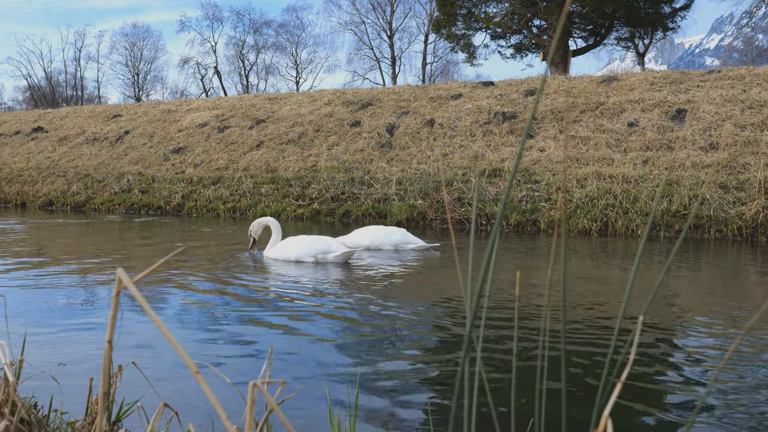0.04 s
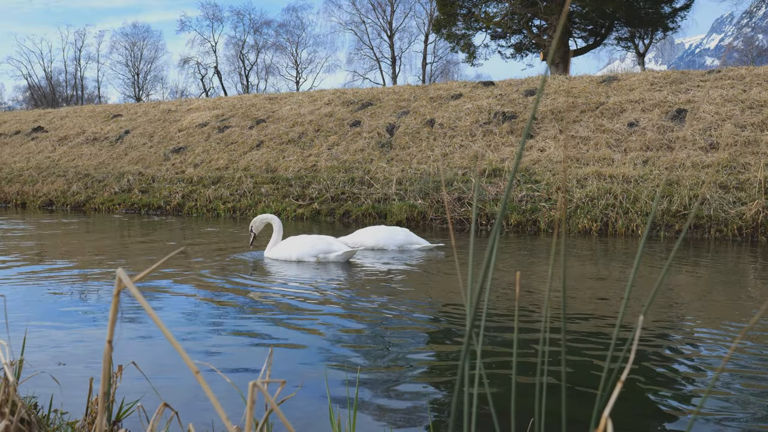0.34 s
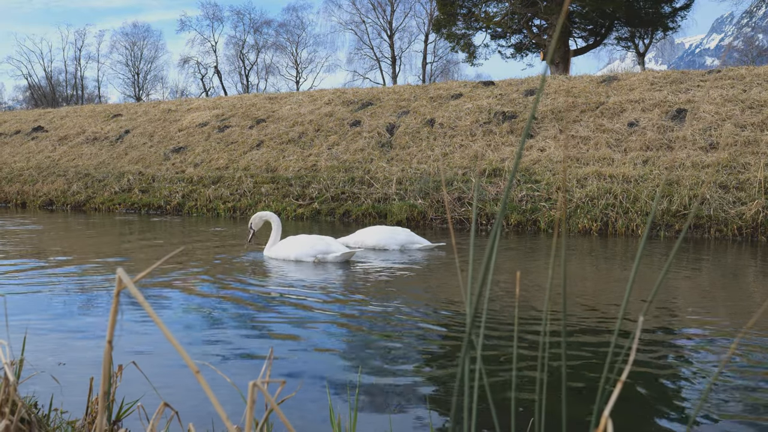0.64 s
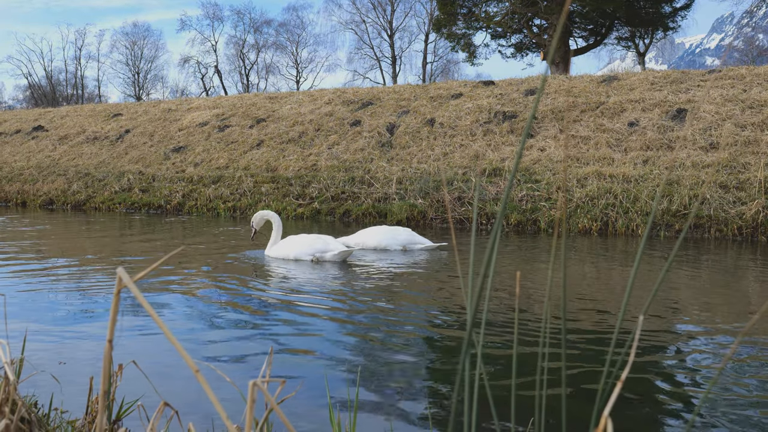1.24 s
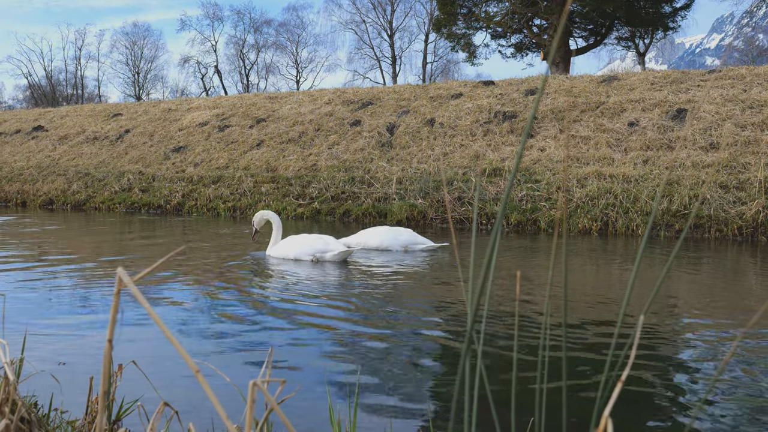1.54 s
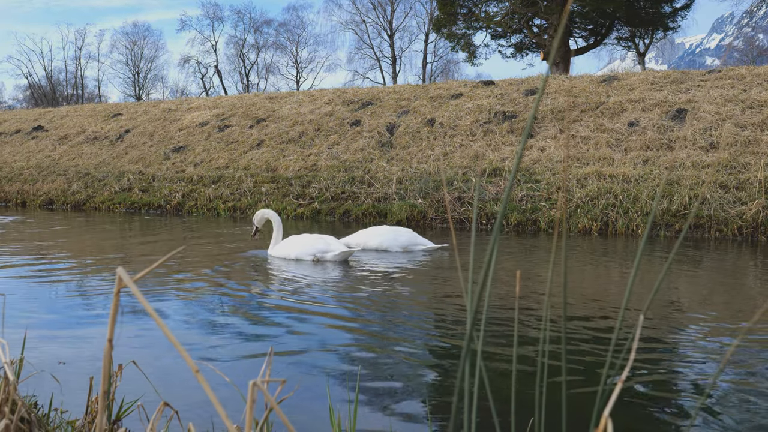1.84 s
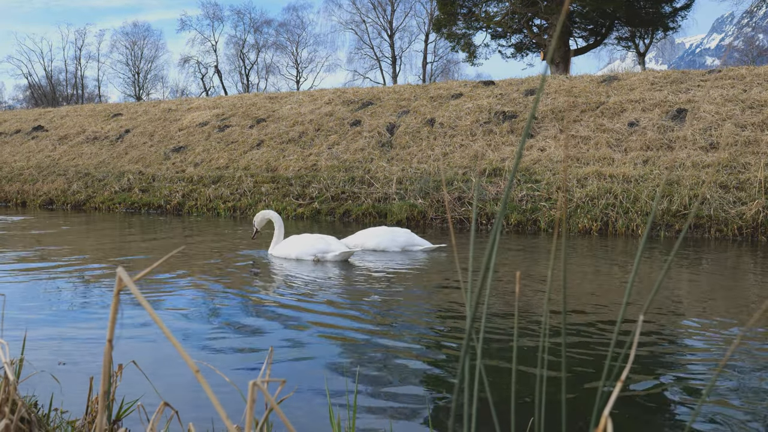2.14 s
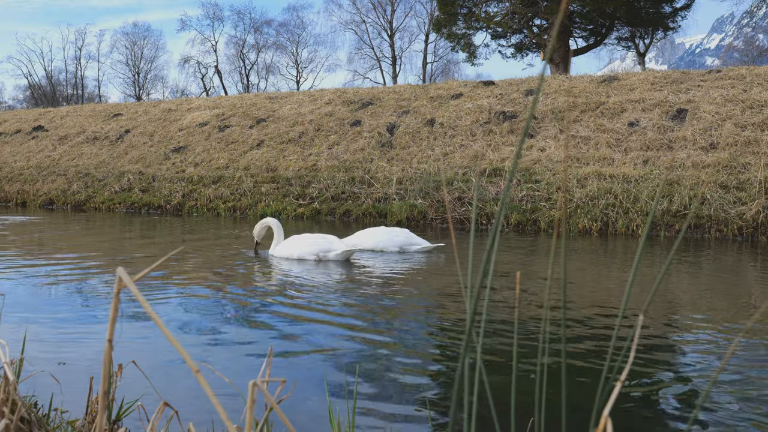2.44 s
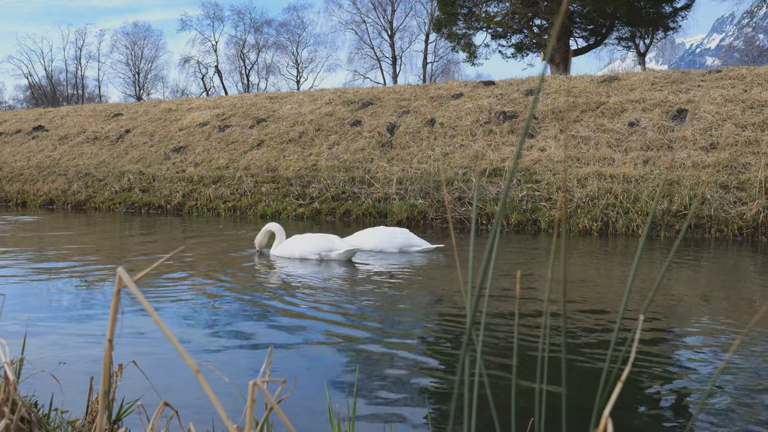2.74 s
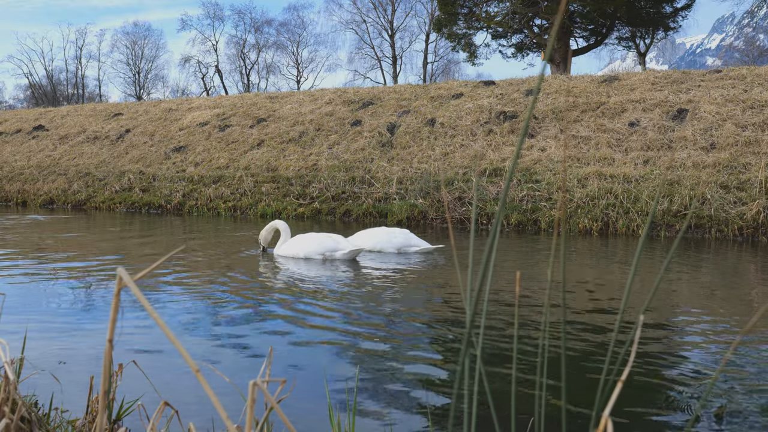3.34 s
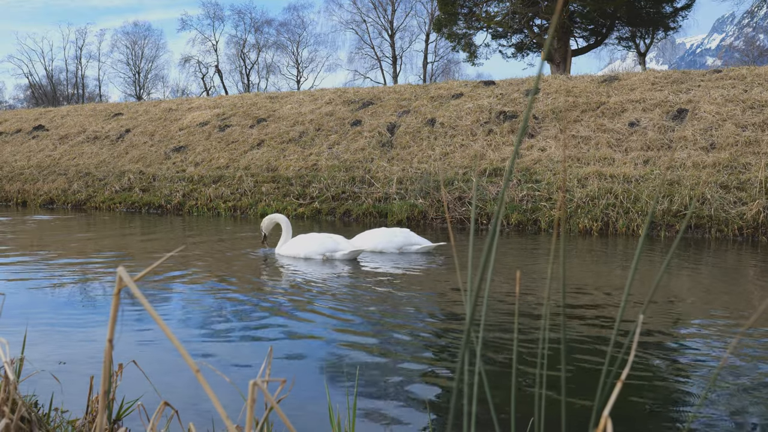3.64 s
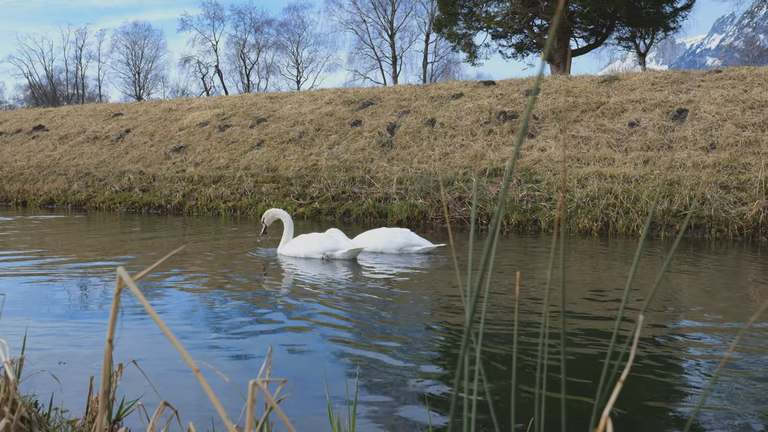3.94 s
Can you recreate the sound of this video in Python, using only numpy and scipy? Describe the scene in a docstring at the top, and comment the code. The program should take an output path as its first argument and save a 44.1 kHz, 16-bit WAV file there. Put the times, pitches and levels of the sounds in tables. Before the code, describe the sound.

Small water drops plink and spatter beside a channel over a steady rumble of distant traffic. Dry reeds tick, a lens motor buzzes softly at the microphone early on, and a far bird calls faintly near the end.

```python
"""A quiet channel bank where swans feed, over a steady bed of distant traffic and faint hiss.
Drops plink and spatter from the start, each a splash and a ringing bubble, and dry reeds tick throughout.
From about 0.45 s a camera's lens motor buzzes softly for a second, its steps ringing the housing.
A far engine swells near 1.8 s and fades; then the drops and ticks grow busier.
Just after 3 s a far bird gives one long falling mew, joined by two fainter ones."""
import sys
import numpy as np
from scipy import signal
from scipy.fft import rfft, irfft
from scipy.io import wavfile

SR = 44100
rng = np.random.default_rng(int(sys.argv[2]) if len(sys.argv) > 2 else 0)


def to_wav(sig):
    """Store sig (one row per channel, or 1-D mono) as 16-bit WAV at the path in sys.argv[1].

    Samples outside -1..1 are clipped; the rate is SR.
    """
    pcm = np.clip(np.atleast_2d(sig), -1, 1) * 32767
    pcm = np.round(pcm).astype(np.int16)
    wavfile.write(sys.argv[1], SR, pcm.T)  # frames by channels


N = 176400
TIME = np.arange(N) / SR
HZ = np.maximum(np.arange(N // 2 + 1) * SR / N, 1)


def from_db(db):
    """Decibels to gain."""
    return 10 ** (np.asarray(db) / 20)


def unit_rms(x):
    """Scale to unit power."""
    return x / np.sqrt(np.mean(x ** 2) + 1e-20)


def over_hz(points):
    """Read a curve along log frequency."""
    hz, value = np.transpose(points)
    return np.interp(np.log(HZ), np.log(hz), value)


def fader(points):
    """A gain ride through points of t/s, level/dB."""
    return from_db(np.interp(TIME, *np.transpose(points)))


def drift(rate_hz):
    """A smooth random wander, mostly slower than rate_hz; rms 1."""
    return unit_rms(irfft(rfft(rng.standard_normal(N)) / (1 + (HZ / rate_hz) ** 2), N))


def wavering_tone(hz, width_hz):
    """A sine whose pitch wanders slightly; rms 1."""
    return unit_rms(np.sin(2 * np.pi * np.cumsum(hz + width_hz / 2 * drift(7.77)) / SR))


def ragged_tone(phase, width_hz):
    """A tone broken up into a narrow band of noise around its pitch; rms 1."""
    return unit_rms(drift(width_hz) * np.sin(phase) + drift(width_hz) * np.cos(phase))


def band_noise(edges_hz, samples):
    """A grain of band-passed noise; rms 1."""
    band = signal.butter(2, edges_hz, "band", fs=SR, output="sos")
    return unit_rms(signal.sosfilt(band, rng.standard_normal(samples)))


def air_noise(spectrum, flicker_db):
    """A flickering bed of coloured stereo noise, mono in the bass and wider above."""
    # likeness of the two ears: f/Hz, correlation (capped at 1 below)
    likeness = [(300, 0.96), (420, 1.46), (700, 1), (1200, 0.72), (2400, .5), (4400, 0.21), (6000, 0.26),
                (8100, 1), (10500, 0.73), (15000, 0.2)]
    # lean of the stereo image: f/Hz, left minus right/dB
    balance = [(300, -1.5), (640, -3), (1200, -3), (2300, 0.3), (7000, 0), (15000, -0.5)]
    colour = from_db(over_hz(spectrum)) / np.sqrt(1 + (HZ / (2 * spectrum[-1][0])) ** 10)
    width = np.clip(HZ / 260 - 1, 0, 1)  # mono below 260 Hz
    ears = np.array([[1], [-1]])
    alike = 1 - width * (1 - np.clip(over_hz(likeness), 0, 1))
    mid, side = rfft(rng.standard_normal((2, N)))
    stereo = np.sqrt(1 + alike) * mid + np.sqrt(1 - alike) * side * ears
    lean = from_db(ears * width * over_hz(balance) / 2)
    return unit_rms(irfft(colour * stereo * lean, N)) * from_db(flicker_db * drift(17.0))


def add(out, start_s, sound):
    """Mix a short sound in at start_s."""
    i = max(int(start_s * SR), 0)
    out[..., i:i + sound.shape[-1]] += sound[..., :max(N - i, 0)]


def over_water(sound):
    """Pan a small sound near the middle and add its reflection off the water."""
    spread_db, echo_s, echo_db = 4, 0.0019, -10.5
    out = np.zeros((2, 2 * len(sound)))
    for ear, pan_db in zip(out, np.array([1, -1]) * rng.normal() * spread_db / 2):
        add(ear, 0, sound * from_db(pan_db))
        add(ear, echo_s * rng.uniform(0.87, 1.3), sound * from_db(echo_db))
    return out


def bank_scatter(sound, t60_s=0.12, wet_db=-9):
    """The grassy banks scatter back a short, faint tail."""
    t = TIME[:SR // 4]
    tail = rng.standard_normal((2, len(t))) * from_db(-60 * t / t60_s)
    tail /= np.sqrt(np.sum(tail ** 2, axis=1, keepdims=True))
    return sound + from_db(wet_db) * signal.fftconvolve(sound, tail, axes=1)[:, :N]


def traffic():
    """Distant traffic: a low rumble under the roar of tyres."""
    # colour of the rumble: f/Hz, relative level/dB
    rumble_colour = [(25, -42), (48, -35), (60, -31), (70, -21), (82, -4.5), (93, -12), (108, 0), (135, 1),
                     (158, -1), (185, 0), (225, -2.5), (265, -6), (298, -4), (340, -10), (390, -16),
                     (560, -30)]
    # colour of the tyre roar: f/Hz, relative level/dB
    tyre_colour = [(350, -17.5), (470, 0), (570, -7), (660, 1), (790, 0.5), (890, -1.5), (1030, 2),
                   (1170, -4.5), (1320, -9.5), (1600, -13), (2100, -14.5), (3500, -25.5)]
    # ride of the tyre roar: t/s, level/dB
    tyre_ride = [(0, -61.5), (1.2, -61.5), (2.2, -62.5), (3.2, -62), (4, -63.5)]
    rumble = from_db(-47) * air_noise(rumble_colour, flicker_db=0.23)
    return rumble + fader(tyre_ride) * air_noise(tyre_colour, flicker_db=1.38)


def hiss():
    """A faint, airy hiss on top of the bed."""
    # colour of the hiss: f/Hz, relative level/dB
    colour = [(1000, 1), (2000, -2.5), (3000, 2.5), (4000, 4), (5200, 0), (6500, -1), (8200, -1.5),
              (9800, -1), (12000, -3), (14000, -3.5), (15800, -7)]
    return from_db(-68) * air_noise(colour, flicker_db=0.6)


def far_hum(hz=686.6):
    """A grainy midrange hum that sinks away."""
    # ride of the hum: t/s, level/dB
    ride = [(0, -66.5), (1.0, -69.5), (1.5, -67.5), (2.3, -72.5), (4, -75.5)]
    return fader(ride) * ragged_tone(2 * np.pi * hz * TIME, width_hz=12)


def far_engine():
    """An engine drones inside the rumble, dips, swells and fades."""
    # ride of the drone: t/s, level/dB
    ride = [(0, -53.5), (.3, -52), (.75, -52.5), (1.0, -63), (1.4, -58.5), (1.8, -51), (2.1, -57),
            (2.5, -63.5), (4, -68)]
    return fader(ride) * wavering_tone(hz=157, width_hz=10.97)


def whines():
    """Three thin, steady whines, barely there."""
    # high tones: f/Hz, rms level/dB, width/Hz
    tones = [(3352, -92, 8), (8000, -92.5, 2), (12000, -88, 2)]
    return sum(from_db(db) * wavering_tone(hz, width_hz) for hz, db, width_hz in tones)


def lens_motor(start_s=0.4465, stop_s=1.56, level_db=-62):
    """Fifty groups of four uneven steps a second knock on the camera's housing and blur into a buzz."""
    # ringing modes of the housing: f/Hz, relative level/dB, t60/s
    modes = [(1490, -5, 0.018), (1950, 0, 0.023), (2060, -8.5, 0.016), (2480, -1, 0.011),
             (3320, -11, 0.0074)]
    group_s, accents_db = 0.02, [-0.5, -6.5, -7.5, -18]
    jitter_s, uneven_db = 0.0001, 3.5
    out, t = np.zeros((2, N)), TIME[:SR // 50]
    for step, step_s in enumerate(np.arange(start_s, stop_s, group_s / len(accents_db))):
        knock = np.zeros((2, len(t)))
        for hz, db, t60_s in modes:
            strike_db = db + uneven_db * rng.standard_normal((2, 1))
            knock += from_db(strike_db - 60 * t / t60_s) * np.sin(2 * np.pi * hz * t)
        gain = from_db(level_db + accents_db[step % len(accents_db)])
        add(out, step_s + jitter_s * rng.normal(), gain * knock)
    return out


def reed_ticks(attack_s=0.00017, t60_s=0.0071, trim_db=-2, top_hz=13400):
    """Each tick is a tiny burst of fracture through one resonance of a dry stalk."""
    # reed ticks: t/s, centre f/Hz, level before trim/dB, width/octaves
    ticks = [(.048, 5900, -51.5, 0.37), (0.115, 6540, -42, 0.73), (.164, 9700, -49.5, .3),
             (.174, 11000, -53, .6), (0.703, 11400, -46.5, 0.49), (.878, 11900, -53, .5),
             (1.176, 9500, -53, .3), (1.186, 9300, -54, .4), (1.191, 10500, -57, .4),
             (1.29, 10300, -53, 0.44), (1.294, 10300, -50, .3), (1.414, 10000, -53.5, .3),
             (1.516, 11800, -45, 0.16), (1.769, 7400, -54, 0.33), (1.958, 10300, -51, .15),
             (2.037, 11300, -48, 0.13), (2.177, 10600, -51, .2), (2.265, 6000, -55, 1),
             (2.521, 4440, -50, 1.3), (2.613, 11000, -45, 1.3), (2.619, 11500, -50, 0.5),
             (2.630, 6500, -50, .3), (2.637, 8500, -45, 0.76), (2.64, 10000, -45, .5),
             (2.6413, 9500, -46, 1), (2.647, 8000, -45, 0.84), (2.720, 7000, -52, 1.1),
             (2.886, 8970, -48, 0.18), (3.088, 10300, -47.5, .2), (3.145, 4900, -41.5, 3.2),
             (3.357, 8400, -51, .3), (3.373, 10400, -47, 0.41), (3.481, 10150, -36, 0.16),
             (3.522, 5550, -52, 1.1), (3.585, 12500, -50, .2), (3.658, 12700, -49, 0.35),
             (3.684, 10850, -52, .2), (3.793, 9500, -49, .3), (3.849, 12300, -50, 0.35),
             (3.864, 6000, -53, 1), (3.877, 8300, -54, 0.66), (3.883, 13500, -51, .3),
             (3.894, 11500, -50, 0.63), (3.899, 12500, -43.5, 0.17)]
    out, t = np.zeros((2, N)), TIME[:SR // 20]
    envelope = (1 - np.exp(-t / attack_s)) * from_db(-60 * t / t60_s)
    for start_s, hz, db, octaves in ticks:
        grain = band_noise(hz * 2 ** (np.array([-0.5, 0.5]) * octaves), len(t))
        add(out, start_s, over_water(from_db(db + trim_db) * grain * envelope))
    return signal.sosfilt(signal.butter(2, top_hz, fs=SR, output="sos"), out)


def far_birds(wobble=0.00604, flutter_db=2, rasp=0.43):
    """Thin, slightly hoarse whistles that slide down."""
    # one contour for each mew: t/s, f/Hz, level/dB
    mews = [
        [(3.168, 1950, -69), (3.195, 2290, -60), (3.225, 2320, -68), (3.255, 2270, -74), (3.28, 2140, -68.5),
         (3.33, 2066, -71.5), (3.385, 1875, -70), (3.475, 1857, -65), (3.55, 1780, -69), (3.655, 1520, -71)],
        [(3.47, 2820, -78), (3.53, 2750, -77), (3.58, 2560, -71), (3.63, 2380, -70), (3.688, 2090, -67),
         (3.70, 2050, -76)],
        [(3.64, 3020, -80), (3.66, 2960, -73), (3.70, 2785, -80)],
    ]
    out = np.zeros(N)
    for mew in mews:
        times, hz, db = np.transpose(mew)
        pitch_hz = np.interp(TIME, times, hz) * (1 + wobble * drift(37.7))
        phase = 2 * np.pi * np.cumsum(pitch_hz) / SR
        level_db = np.interp(TIME, times, db, left=-200, right=-200) + flutter_db * drift(30)
        hoarseness = rasp * ragged_tone(phase, width_hz=109) / np.sqrt(2)
        out += from_db(level_db) * (np.sin(phase) + hoarseness)
    return out


def drop(hz, t60_s):
    """A splash and a small bubble whose pitch creeps up as it rings; higher drops splash brighter."""
    attack_s, chirp_per_s, bubble_db = 0.00029, 2.6, -1
    splash_gain, splash_t60_s = 0.29, 0.0097
    t = TIME[:SR // 20]
    phase = 2 * np.pi * hz * t * (1 + chirp_per_s * t / 2)
    bubble = np.sin(phase) * from_db(bubble_db - 60 * t / t60_s)
    splash = band_noise([0.63 * hz, 1.52 * hz], len(t)) * from_db(-60 * t / splash_t60_s)
    return (bubble + splash_gain * splash) * (1 - np.exp(-t / attack_s))


def plinks():
    """Single drops hit the water and ring out clearly."""
    # falling drops: t/s, bubble f/Hz, gain/dB, t60/s
    drops = [(.012, 2120, -45, 0.02), (0.022, 1880, -42.5, 0.011), (.034, 1710, -48.5, 0.029),
             (0.047, 1850, -43, 0.0075), (0.098, 6240, -44, 0.011), (.139, 6800, -51, 0.0088),
             (.196, 2230, -49, 0.0056), (.494, 2690, -50, 0.0088), (.648, 2750, -53, 0.0091),
             (.712, 2750, -49.5, 0.013), (1.089, 1810, -44.5, 0.02), (1.096, 1840, -44, 0.012),
             (1.3336, 2390, -46, 0.02), (1.608, 2970, -57, .01), (1.707, 2600, -55, .01),
             (2.2597, 2040, -48, 0.013), (2.265, 1950, -42.5, 0.0056), (2.265, 4400, -41.5, 0.012),
             (2.288, 3180, -58, 0.016), (2.308, 4650, -48.5, 0.0085), (2.369, 5340, -51.5, 0.0065),
             (2.456, 2800, -52, 0.0086), (2.489, 3100, -44.5, 0.0028), (2.5211, 2540, -42.5, 0.0043),
             (2.542, 2360, -51, .01), (2.785, 2380, -51, 0.013), (2.800, 4480, -51.5, .008),
             (2.940, 3080, -48, 0.0068), (3.089, 2700, -49, 0.011), (3.094, 4770, -52, 0.0073),
             (3.298, 5510, -50, .008), (3.506, 5340, -48, 0.0074), (3.520, 2380, -47, 0.011),
             (3.605, 5500, -46, 0.0039), (3.62, 4430, -49, 0.0053), (3.626, 2510, -49, 0.0073),
             (3.672, 5600, -52, 0.0065), (3.744, 1900, -51, 0.0079), (3.797, 1690, -53, 0.025),
             (3.905, 1710, -45.5, 0.0061), (3.946, 1840, -48.5, 0.013)]
    out = np.zeros((2, N))
    for start_s, hz, db, t60_s in drops:
        add(out, start_s, over_water(from_db(db) * drop(hz, t60_s)))
    return out


def patter(per_s=30, low_hz=1840, high_hz=11400, softest_db=-63.5, range_db=7):
    """Much smaller drops land at random between the plinks."""
    out = np.zeros((2, N))
    for when, pitch, size in rng.random((int(per_s * N / SR), 3)):
        droplet = drop(low_hz * (high_hz / low_hz) ** pitch, t60_s=0.0061)
        add(out, when * N / SR, over_water(from_db(softest_db + range_db * size) * droplet))
    return out


def spatters(droplets_per_s=600, range_octaves=0.99, range_db=5):
    """A small splash throws droplets of mixed pitch and size that land in quick, uneven succession."""
    # small splashes: t/s, length/s, centre f/Hz, top droplet gain/dB
    splashes = [(.01, 0.046, 1890, -51), (0.091, .025, 2270, -54), (0.364, 0.044, 2000, -61),
                (2.26, .008, 2500, -50), (2.439, 0.05, 3550, -60), (2.783, 0.024, 2880, -65),
                (2.942, 0.0093, 2900, -57), (3.087, .009, 3200, -49), (3.43, 0.023, 2200, -58),
                (3.517, .011, 2400, -51), (3.61, .035, 3180, -60.5), (3.681, 0.016, 2400, -54),
                (3.722, 0.026, 1800, -55), (3.788, 0.015, 1890, -55), (3.857, .025, 3320, -55.5),
                (3.887, 0.019, 2700, -51)]
    out = np.zeros((2, N))
    for start_s, length_s, hz, db in splashes:
        count = max(int(droplets_per_s * length_s), 1)
        for k, (when, pitch, size) in enumerate(rng.random((count, 3))):
            droplet = drop(hz * 2 ** (range_octaves * (pitch - 0.5)), t60_s=0.0042)
            gain = from_db(db - range_db * (1 - size))
            add(out, start_s + length_s * (k + when) / count, over_water(gain * droplet))
    return out


def scene():
    """The far bed and the dry motor, with reeds, birds and water scattering off the banks."""
    bed = traffic() + hiss() + far_hum() + far_engine() + whines()
    return bed + lens_motor() + bank_scatter(reed_ticks() + far_birds() + plinks() + patter() + spatters())


def record(dry):
    """A steep high cut takes off the very top."""
    cutoff_hz = 15800
    return irfft(rfft(dry) / np.sqrt(1 + (HZ / cutoff_hz) ** 400), N)


dry = scene()
out = record(dry)
to_wav(out)
```